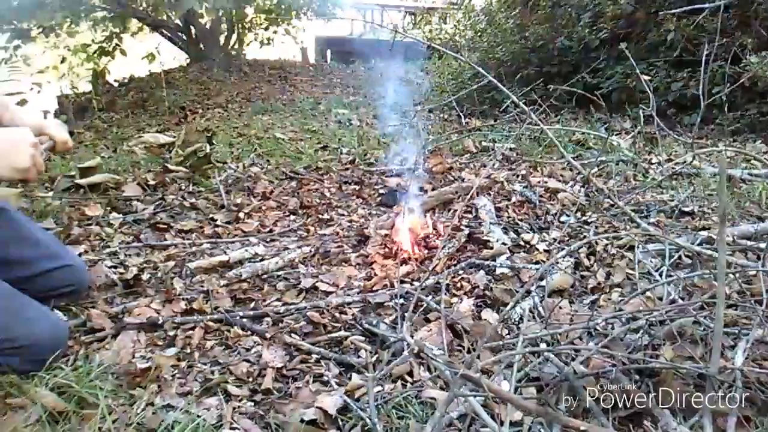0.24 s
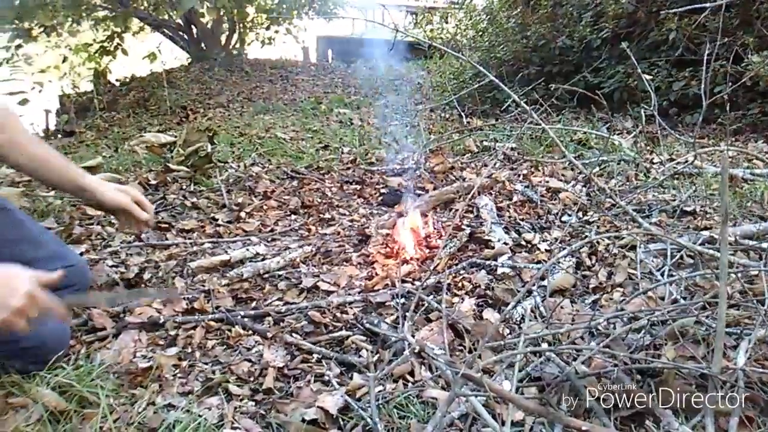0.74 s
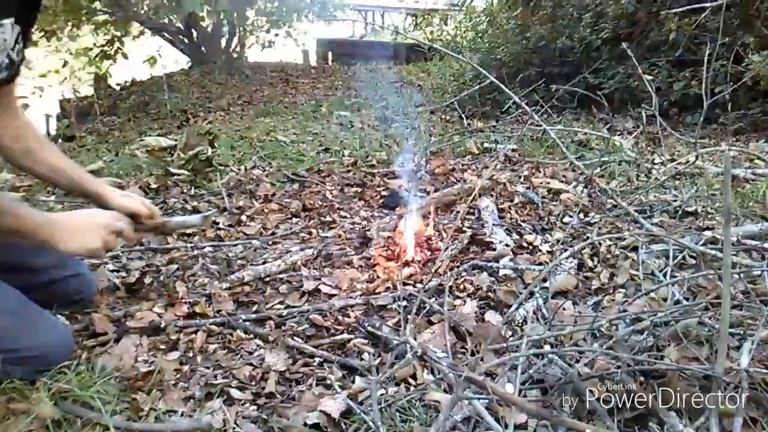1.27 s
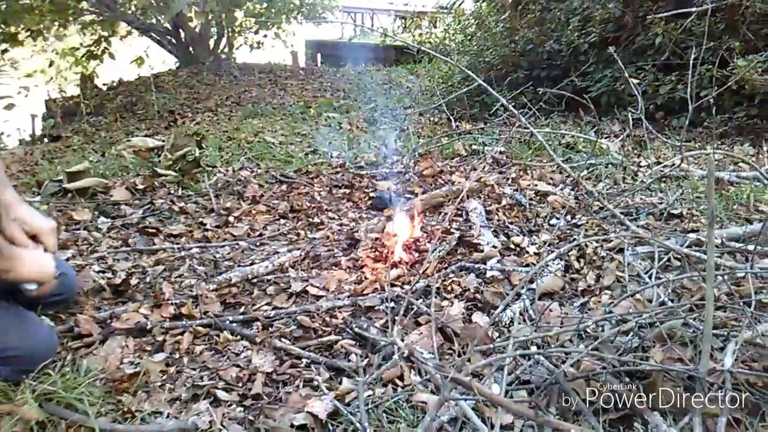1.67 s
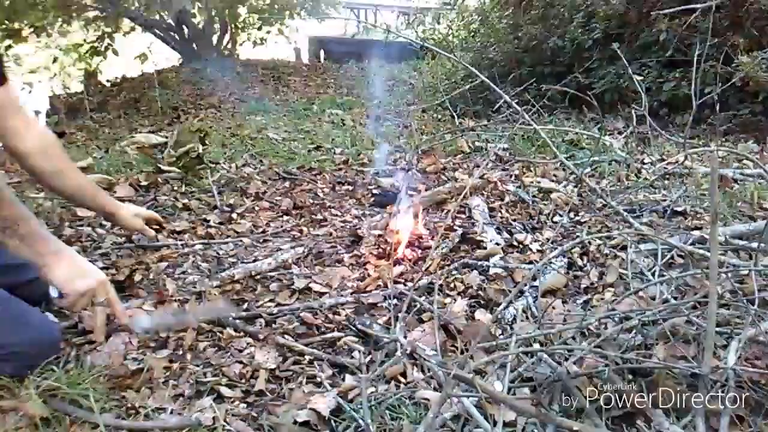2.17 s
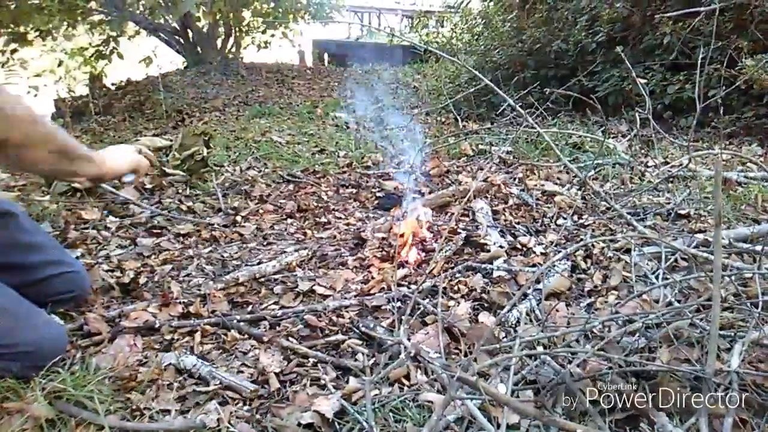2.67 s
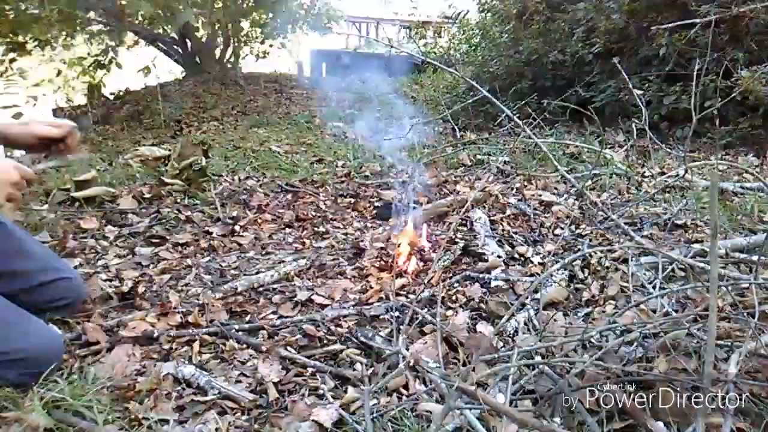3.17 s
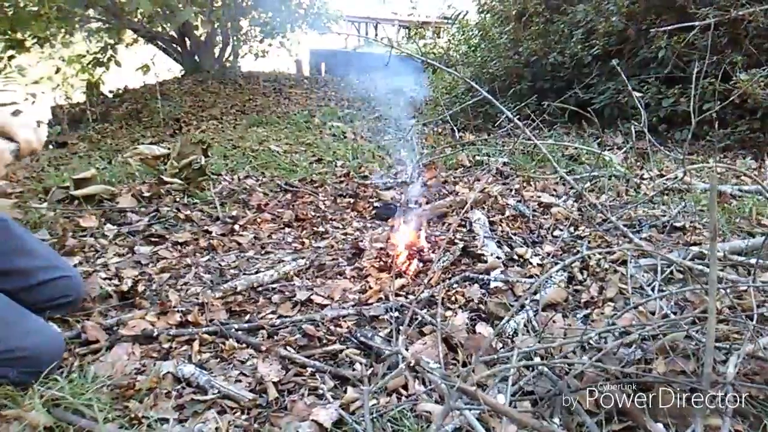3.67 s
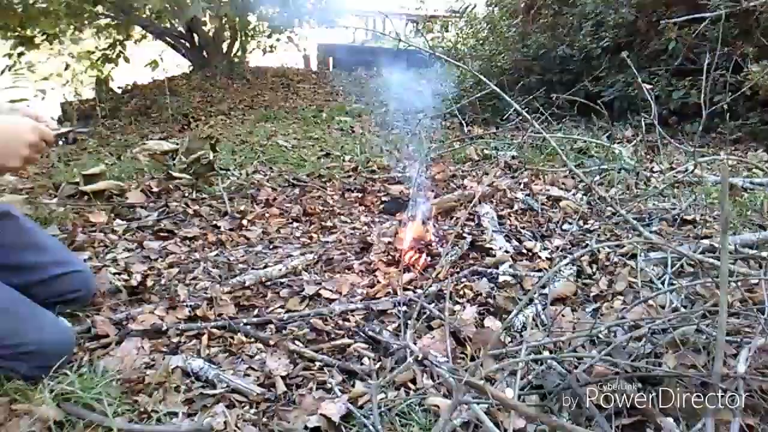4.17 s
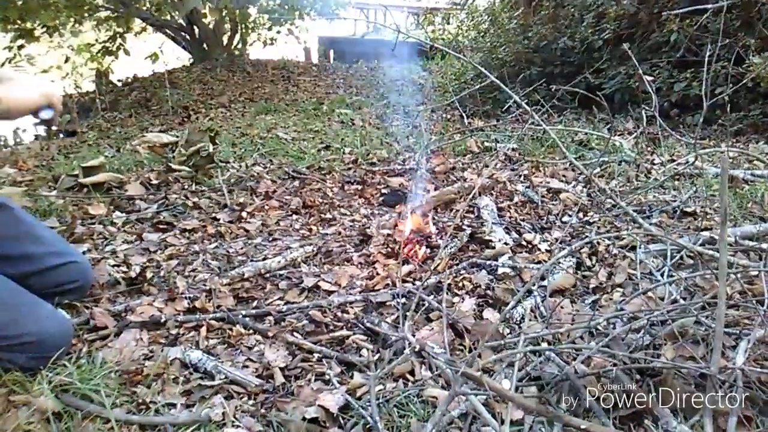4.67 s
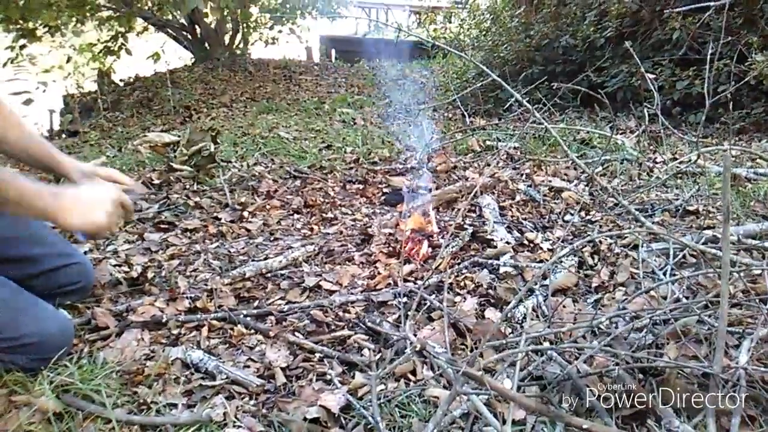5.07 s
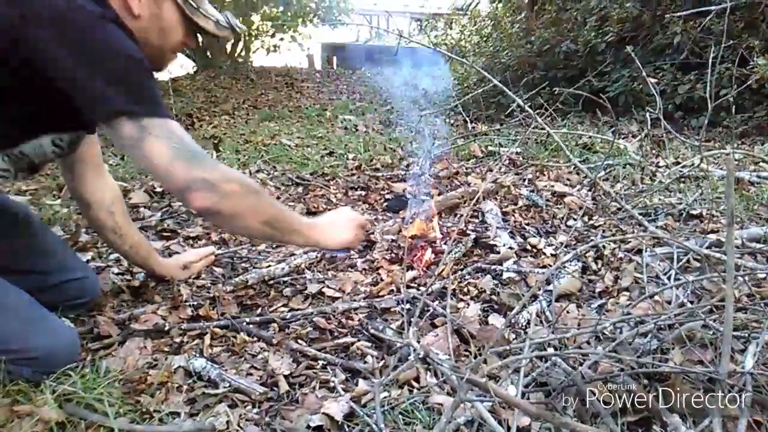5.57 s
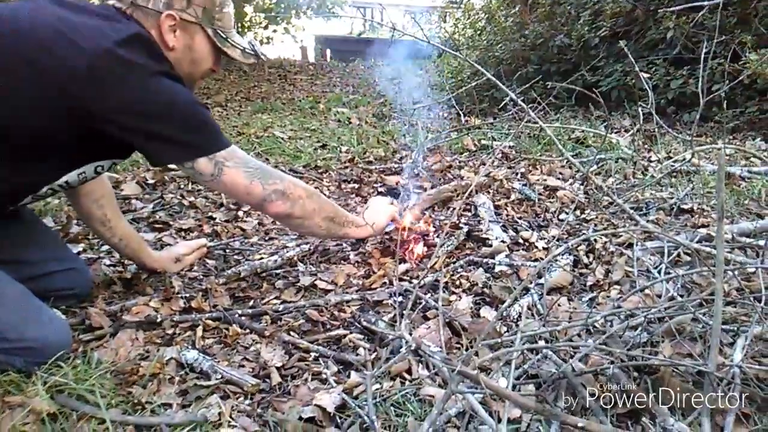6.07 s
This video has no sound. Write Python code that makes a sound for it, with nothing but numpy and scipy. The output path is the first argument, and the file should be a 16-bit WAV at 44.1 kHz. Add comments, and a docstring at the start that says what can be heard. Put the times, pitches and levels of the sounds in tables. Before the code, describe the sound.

In a quiet yard among trees, someone breaks kindling close by. Twigs crack at irregular intervals between short crunches of dry leaves, building to one loud, splintering snap of a thicker stick, then easing into light clicks and rustling. A small fire ticks and hisses softly throughout. Faint crickets call in the distance over a low rumble of air, and a closer one trills now and then to the left.

```python
"""A low outdoor rumble, far crickets and the ticking fizz of a small leaf fire fill a wooded yard.
Someone kneels by the fire, picks twigs from the crackling dry leaves and snaps them for kindling.
Each snap is a burst of tearing fibres with a short tail from the trees; thicker sticks ring briefly.
On the left, one near cricket trills now and then, a raspy whistle to each wing stroke."""
import sys
import numpy as np
from scipy import signal
from scipy.fft import rfft, irfft
from scipy.io import wavfile
from scipy.ndimage import uniform_filter1d

SR = 44100
rng = np.random.default_rng(int(sys.argv[2]) if len(sys.argv) > 2 else 0)


def digitize_waveform(pressure):
    """Quantize a signal to 16-bit integers and store it at the path in sys.argv[1].

    Rows of a 2-D input are taken as channels; values are limited to [-1, 1].
    """
    field = np.atleast_2d(pressure).T
    bounded = np.clip(field, -1, 1)
    quanta = np.round(bounded * 32767).astype(np.int16)
    wavfile.write(sys.argv[1], SR, quanta)


N = 278712
TIME = np.arange(N) / SR
GROUND_LAG_S = 0.00017  # left port behind right, for sound from the leaves


def amp(db):
    """Decibels to gain."""
    return 10 ** (np.asarray(db) / 20)


def unit(x):
    """Scales to rms 1."""
    return x / np.sqrt(np.mean(x ** 2) + 1e-20)


def read(points, hz):
    """Reads a table on a log-frequency axis."""
    f, value = np.transpose(points)
    return np.interp(np.log(hz + 1), np.log(f + 1), value)


def add(mix, start_s, sound):
    """Mixes a sound in at start_s."""
    part = mix[..., max(round(start_s * SR), 0):][..., :sound.shape[-1]]
    part += sound[..., :part.shape[-1]]


def colour(x, points):
    """Applies a spectrum table, rolling off beyond its ends; rms 1."""
    hz = np.fft.rfftfreq(N, 1 / SR)
    rolloff = np.minimum(hz / points[0][0], 1) ** 2 / np.maximum(hz / points[-1][0], 1) ** 2
    return unit(irfft(rfft(x) * amp(read(points, hz)) * rolloff, N))


def minimum_phase(gain_db):
    """Causal impulse response with the given gain per bin."""
    log_gain = np.log(amp(np.r_[gain_db, gain_db[-2:0:-1]]))
    return np.fft.ifft(np.exp(np.conj(signal.hilbert(log_gain)))).real


def stroke(peak_s, rise_s, fall_s, hold_s=0):
    """Envelope of one movement: builds, holds, dies away ever faster."""
    build = np.clip(1 + (TIME - peak_s) / rise_s, 0, 1) ** 2
    return build * np.exp(-np.clip((TIME - peak_s - hold_s) / fall_s, 0, 10) ** 1.09)


def wander(per_s):
    """Random drift, rms 1."""
    return unit(np.interp(TIME * per_s, np.arange(500), rng.standard_normal(500)))


def grains(per_s):
    """Tiny fractures of uneven size, each a stereo noise burst of about 1 ms."""
    sizes = amp(4 * np.minimum(rng.exponential(1, N), 3)) * (rng.random(N) < per_s / SR)
    power = signal.lfilter([1], [1, -np.exp(-2 / (.0009 * SR))], sizes ** 2)
    return unit(np.sqrt(power) * rng.standard_normal((2, N)))


# left-right likeness: f/Hz, coherence
PORT_COHERENCE = [(300, .4), (1200, 0.52), (2200, .7), (3200, 0.84), (4500, 0.31), (7000, 0.36),
                  (11000, 0.19)]

def ports(pair, share, lag_s=GROUND_LAG_S):
    """Two microphone ports: the left hears part of the right's sound, slightly later."""
    size = pair.shape[1]
    hz = np.fft.rfftfreq(size, 1 / SR)
    own, right = rfft(pair)
    coherence = np.clip(share * read(PORT_COHERENCE, hz), 0, 1)
    delayed = right * np.exp(-2j * np.pi * hz * lag_s)
    left = coherence * delayed + np.sqrt(1 - coherence ** 2) * own
    return irfft(np.array([left, right]), size)


# outdoor air spectrum: f/Hz, level/dB
AIR_SPECTRUM = [(25, -24), (40, -5.5), (62, 0.5), (90, -4.5), (125, -6), (160, -9.5), (200, -8), (400, -14),
                (600, -13.5), (980, -16.5), (1100, -23.5), (2600, -22.5), (3400, -23)]
# rumble contour: t/s, level/dB
RUMBLE = [(0, -65.5), (1.2, -63), (1.9, -66), (2.4, -64), (3.3, -63), (3.9, -66.5), (5.0, -66.5),
          (5.6, -64.5), (6.32, -64)]
# the kneeling body shifts its weight: t/s, level/dB
BUMPS = [(.245, -59), (.45, -57.5), (1.28, -54), (1.6, -59.5), (2.3, -73), (2.52, -57), (3.15, -52.5),
         (3.365, -52.5), (5.61, -58), (5.96, -60), (6.23, -61.5)]

def air(upper_db=-69, sway_db=-0.3, split_hz=300):
    """Outdoor rumble that sways a little and carries dull bumps; its upper part stays even."""
    noise = colour(ports(rng.standard_normal((2, N)), share=0.23), AIR_SPECTRUM)
    low = signal.sosfiltfilt(signal.butter(2, split_hz, fs=SR, output="sos"), noise)
    bumps = sum(amp(db) * stroke(s, rise_s=0.064, fall_s=0.036) for s, db in BUMPS)
    rumble = amp(np.interp(TIME, *np.transpose(RUMBLE)) + sway_db * wander(per_s=13))
    pan = amp([[-0.5], [0.5]])
    return amp(upper_db) * (noise - low) + low * np.hypot(rumble, bumps) * pan


# far cricket calls: start/s, end/s, level/dB
FAR_CALLS = [(-.04, 0.66, -64), (0.58, 0.873, -63.5), (0.977, 1.453, -59.5), (1.49, 2.23, -72.5),
             (2.176, 2.736, -63.5), (3.02, 3.61, -64.5), (3.545, 3.944, -66.5), (3.95, 4.373, -66),
             (4.62, 5.177, -64.5), (5.49, 6.45, -68)]
# their band: f/Hz, level/dB
CHORUS_SPECTRUM = [(3300, -32), (3650, -10), (3830, -2), (4060, 0), (4180, -5), (4400, -30)]

def far_crickets(floor_db=-74, fade_s=0.14, flutter_db=0.85, whine_db=-84, whine_hz=13480):
    """Calls swell and fade in turn, blurred into one fluttering band under a thin high whine."""
    power = amp(floor_db) ** 2
    for start_s, end_s, db in FAR_CALLS:
        swell = np.clip(np.minimum(TIME - start_s, end_s - TIME) / fade_s, 0, 1)
        power = power + (amp(db) * swell) ** 2
    band = colour(rng.standard_normal((2, N)), CHORUS_SPECTRUM)
    flutter = amp(flutter_db * wander(per_s=37))
    whine_spectrum = [(whine_hz - 300, -35), (whine_hz, 0), (whine_hz + 300, -35)]
    whine = colour(rng.standard_normal((2, N)), whine_spectrum)
    return band * np.sqrt(power) * flutter + amp(whine_db) * whine


# flame fizz: f/Hz, level/dB
FIZZ_SPECTRUM = [(1000, -13), (3000, -11.5), (5000, -14), (8000, 9.5), (13000, 8), (14300, -19),
                 (15200, -34)]
# dry leaf cracking, burnt or crushed: f/Hz, level/dB
LEAF_SPECTRUM = [(1470, -52), (2500, -19), (3270, -26), (3860, -14), (6740, -7.5), (8350, -6.5),
                 (11000, -11.5), (14300, -13), (14700, -37), (15500, -74)]

def fire(ticks_db=-75, fizz_db=-74):
    """Tiny ticks of burning leaves over a steady fizz."""
    ticks = colour(ports(grains(per_s=400), share=0.5), LEAF_SPECTRUM)
    fizz = colour(rng.standard_normal((2, N)), FIZZ_SPECTRUM)
    return amp(ticks_db) * ticks + amp(fizz_db) * fizz


# hand or knee presses the leaves: peak/s, crisp/dB, scrape/dB, press/s, settle to 1/e/s
STIRS = [(0.24, -59.5, -66.5, 0.3, 0.27), (0.469, -53.5, -75, 0.044, 0.011), (0.714, -58.5, -69, .012, .09),
         (1.077, -36, -46, 0.017, 0.027), (1.16, -55.5, -64, 0.071, 0.09),
         (1.275, -45, -57.5, 0.062, 0.063), (1.48, -62, -77, 0.18, 0.13), (1.63, -62, -72, 0.043, 0.099),
         (1.88, -64, -92, 0.11, 0.091), (2.183, -52.5, -60.5, 0.041, 0.057), (2.436, -37, -49, 0.027, 0.13),
         (2.584, -45.5, -57, 0.11, 0.063), (3.133, -38, -52.5, 0.042, 0.019), (3.3, -59, -68.5, 0.18, 0.06),
         (3.6, -58.5, -74, 0.11, 0.082), (3.77, -61, -84, 0.048, 0.074),
         (3.999, -40.5, -58.5, 0.086, 0.012), (4.419, -46.5, -60.5, .025, .025),
         (4.49, -59.5, -60, 0.058, 0.052), (4.87, -71, -74.5, 0.13, 0.065), (5.06, -56, -79, 0.034, 0.019),
         (5.45, -66, -88, 0.13, .16), (5.603, -43.5, -57, 0.04, 0.058), (5.93, -60, -70.5, .06, 0.029),
         (6.225, -65, -71.5, 0.038, .2)]
# leaf scrape: f/Hz, level/dB
SCRAPE_SPECTRUM = [(150, -36.5), (400, -8.5), (750, -3.5), (1200, -5), (2000, -0.5), (2800, 0.5),
                   (4500, -21.5)]
# stick drawn over leaves: f/Hz, level/dB
DRAG_SPECTRUM = [(900, -33), (1300, -10), (1900, -10), (2300, -25), (3200, 3), (5000, 3), (7000, -8),
                 (14000, -11), (15500, -56)]

def leaves(stir_trim_db=-1, rest_crisp_db=-80, rest_scrape_db=-86, drag_db=-46):
    """Crushed leaves: crisp grains and sparse cracks over a duller scrape; one stick is dragged."""
    cracks = .45 * grains(per_s=150)
    crisp = colour(ports(grains(per_s=2300) + cracks, share=0.9), LEAF_SPECTRUM)
    scrape = colour(ports(grains(per_s=1800) + cracks, share=0.85), SCRAPE_SPECTRUM)
    drag = colour(ports(grains(per_s=3700), share=0.9), DRAG_SPECTRUM)
    crisp_power, scrape_power = amp(rest_crisp_db) ** 2, amp(rest_scrape_db) ** 2
    for peak_s, crisp_db, scrape_db, press_s, settle_s in STIRS:
        press = amp(stir_trim_db) * stroke(peak_s, press_s, settle_s)
        crisp_power = crisp_power + (amp(crisp_db) * press) ** 2
        scrape_power = scrape_power + (amp(scrape_db) * press) ** 2
    pull = amp(drag_db) * stroke(peak_s=2.18, rise_s=0.044, fall_s=0.013, hold_s=.032)
    return crisp * np.sqrt(crisp_power) + scrape * np.sqrt(scrape_power) + drag * pull


# near cricket trills: start/s, end/s, level/dB, f/Hz, wing rate/Hz
TRILLS = [(0.089, 0.545, -65, 3746, 34), (0.928, 1.365, -68, 3686, 35.4), (3.058, 3.5, -65.5, 3742, 34.6),
          (5.78, 6.28, -67.5, 3732, 32)]

def near_cricket(duty=.86):
    """Each wing stroke is a short, raspy whistle whose pitch arches, then sinks as the wing slows."""
    out = np.zeros(N)
    for start_s, end_s, db, hz, wing_hz in TRILLS:
        t = np.arange(0, end_s - start_s, 1 / SR)
        sweep = np.minimum(t * wing_hz % 1 / duty, 1)
        waver, rasp = (unit(uniform_filter1d(v, size=110))[:len(t)] for v in rng.standard_normal((2, N)))
        pitch_hz = hz * (1 - .035 * (sweep - .5) - .19 * (sweep - .5) ** 2 + .008 * waver)
        force = np.sin(np.pi * sweep) * (1 + .25 * rasp)
        song = force * np.sin(2 * np.pi * np.cumsum(pitch_hz) / SR)
        add(out, start_s, amp(db) * unit(song * signal.windows.tukey(len(t), .08)))
    return np.array([out, out])


# yard reverberation: f/Hz, t60/s
TREE_DECAY = [(300, 0.33), (2000, 0.61), (6000, 0.64), (14000, 0.43)]

def trees(x):
    """Diffuse scatter from trunks and bushes; each band dies at its own speed."""
    hz, t, bands = signal.stft(rng.standard_normal((2, SR)), SR, nperseg=256)
    decay = amp(-60 * t / read(TREE_DECAY, hz)[:, None])
    tail = signal.istft(bands * decay, SR, nperseg=256)[1]
    return signal.fftconvolve(x, tail / np.linalg.norm(tail[0]), axes=1)[:, :N]


# breaking twig: f/Hz, level/dB
SNAP_SPECTRUM = [(80, -59), (500, -32), (720, -21), (950, -23.5), (1400, -17), (1950, -15.5), (2400, -13),
                 (2900, -8.5), (3600, -4.5), (4700, -6.5), (6500, -2), (8000, 1), (9700, 3), (12000, -1.5),
                 (14300, -8), (15500, -37.5)]

def snap(level_db, body_db, top_db, fall_s, lag_s=GROUND_LAG_S, rise_s=0.00055, scatter_s=0.0072):
    """Fibres tear in a quick burst that rings the twig's resonances and scatters off the ground."""
    t, hz = np.arange(2048) / SR, np.fft.rfftfreq(1024, 1 / SR)
    burst = (np.exp(-t / fall_s) + 0.25 * np.exp(-t / scatter_s)) * (1 - np.exp(-t / rise_s))
    tear = ports(rng.standard_normal((2, len(t))), share=0.98, lag_s=lag_s) * burst
    resonances_db = 2 * unit(uniform_filter1d(rng.standard_normal(len(hz)), size=9))
    woody_db = read([(900, 0.82), (2000, 1.0), (4500, 0)], hz) * (body_db + 19)
    sizzle_db = read([(6000, 0.016), (11000, 0.98)], hz) * (top_db + 3)
    twig = minimum_phase(read(SNAP_SPECTRUM, hz) + resonances_db + woody_db + sizzle_db)
    sound = signal.fftconvolve(tear, twig[None], axes=1)
    return amp(level_db) * sound * np.sqrt(np.sum(burst ** 2) / np.sum(sound ** 2))


# twig snaps and fire pops: t/s, level/dB, body/dB (neutral -19), top/dB (neutral -3), fall to 1/e/s
SNAPS = [(0.099, -41.5, -22, -12, 0.00091), (0.184, -39, -10, -11, .001), (0.2273, -37, -16, -10.5, 0.0011),
         (0.2918, -35, -6.5, -14, 0.0013), (0.361, -49, -24, -14, 0.0027), (0.471, -42, -35, -2, .002),
         (1.054, -33, -24, -15, 0.00081), (1.073, -29, -40, -22, 0.004), (1.082, -25, -51, -11, 0.0037),
         (1.201, -45.5, -32, -17, .0015), (1.254, -42, -33, -15, 0.0032), (1.4266, -48, -40, -14, 0.0033),
         (1.613, -45.5, -12.5, -11, 0.0025), (1.7812, -38.5, -29, -12, 0.0017),
         (1.939, -50.5, -6, -7, .0024), (1.9631, -42, -13, -21, 0.0018), (2.427, -34, 3, -6, 0.0033),
         (2.4322, -19.5, -48, -19, 0.0013), (2.4367, -30, 1, 6, 0.011), (2.4425, -19.5, -43, -23, 0.0019),
         (2.4437, -23, -3, 11, 0.0019), (2.54, -31, -52, -21, .0017), (2.575, -28.5, -69, -12, 0.0021),
         (2.67, -37, -53, -15, 0.0021), (2.994, -38.5, -48, -2, .0012), (3.057, -45.5, -30, -10, 0.0036),
         (3.074, -42, -22, -6, 0.0033), (3.1108, -37.5, -45, -3, 0.0018), (3.1242, -20.5, -35, -5, 0.0018),
         (3.1348, -30, -8.5, -11, 0.0026), (3.1399, -31, -14, -7, .002), (3.549, -44.5, -39, -8, 0.0032),
         (3.5819, -26.5, -26.5, -12.5, 0.0018), (3.8526, -46.5, -32, -1, 0.0057),
         (3.8659, -34.5, -17, -18, 0.0011), (3.8924, -46, -17, -11, 0.0021),
         (3.9443, -38.5, -47.5, -4, .0013), (3.9738, -23, -17, 1.5, 0.0014),
         (3.9848, -10.5, -18, -4, 0.0022), (3.9883, -14.5, -5, 25, 0.0021),
         (3.993, -12.5, -27.5, -21, 0.0022), (4.0912, -32, -16, 2, 0.0016),
         (4.2606, -43.5, -4, -19, 0.0016), (4.3958, -48.5, -25, 2, 0.0021),
         (4.4152, -36.5, -13, -3.5, 0.0023), (4.4432, -28.5, -11, -13, 0.0015),
         (4.4857, -36, -2, -5, .0023), (4.5981, -45, -4, 2, 0.0015), (4.659, -45.5, -14, -4, .0012),
         (4.6704, -43, -19, -1, .0014), (4.86, -53.5, 4, -7, 0.0019), (5.269, -36, -49, -13, 0.00095),
         (5.2797, -51, -4, -11.5, .0024), (5.67, -38.5, -50, -12, 0.0012), (5.922, -44, -16, 2, 0.0026)]
# bearing of the twigs: t/s, left port lag/s
TWIG_BEARING = [(2.7, 0.00013), (3.1, 0.00019), (3.95, .00025), (4.45, .0002)]

def snaps(gain_db=3):
    """Twigs snap and the fire pops; a thick twig gives way in several cracks."""
    out = np.zeros((2, N))
    for start_s, level_db, body_db, top_db, fall_s in SNAPS:
        lag_s = np.interp(start_s, *np.transpose(TWIG_BEARING))
        add(out, start_s, snap(level_db, body_db, top_db, fall_s, lag_s))
    return amp(gain_db) * out


# hiss returned by foliage: f/Hz, level/dB
ECHO_SPECTRUM = [(400, -34.5), (1000, -24), (2000, -13.5), (2500, -5), (4000, -0.5), (6500, 1),
                 (10000, 0.5), (14000, -8.5), (15200, -49.5)]

def foliage_echo(x, t60_s=0.28, build_s=0.0014):
    """Countless leaves return a crack as a hiss that follows its power, flecked by flying splinters."""
    power = uniform_filter1d((x ** 2).mean(0), size=64)
    t = np.arange(SR // 2) / SR
    tail = np.exp(-2 * np.log(1000) * t / t60_s) * (1 - np.exp(-t / build_s))
    echo_power = abs(signal.fftconvolve(power, tail / tail.sum())[:N])
    splinters = .55 * grains(per_s=110)
    hiss = colour(ports(rng.standard_normal((2, N)) + splinters, share=0.45), ECHO_SPECTRUM)
    return np.sqrt(echo_power) * hiss


# sticks ringing as they break or knock: t/s, f/Hz, level/dB, t60/s
KNOCKS = [(0.293, 2840, -43, .018), (1.939, 1330, -48, 0.019), (3.127, 3540, -25, 0.034),
          (3.127, 800, -50, .03), (3.864, 2970, -31, 0.014), (3.9869, 2396, -28, 0.051),
          (3.994, 2630, -30.5, .03), (4.4436, 650, -36, .015), (5.2702, 6470, -33, 0.02)]

def knocks(rise_s=0.00063, left_lag_samples=4):
    """A thicker stick swings up and rings briefly in a bending mode."""
    out, t = np.zeros(N), np.arange(4096) / SR
    for start_s, hz, db, t60_s in KNOCKS:
        swing = (1 - np.exp(-t / rise_s)) * np.exp(-np.log(1000) * t / t60_s)
        add(out, start_s, amp(db) * swing * np.sin(2 * np.pi * hz * t))
    return np.array([np.roll(out, left_lag_samples), out])


def embers(per_s=3.4, max_pops=120):
    """Faint pops at random moments, each of its own size and woodiness."""
    out = np.zeros((2, N))
    starts_s = np.cumsum(rng.standard_exponential(max_pops)) / per_s
    for start_s, (size, woodiness) in zip(starts_s, rng.uniform(-1, 1, (max_pops, 2))):
        pop = snap(level_db=-65 + 3 * size, body_db=-16 + 8 * woodiness, top_db=-4, fall_s=0.00092)
        add(out, start_s, pop)
    return out


# background dips: t/s, gain/dB
LULLS = [(.67, -2), (.88, -4), (2.91, -5), (4.35, -1.5), (5.2, -5.5), (6.13, -2.5)]

def lulls(half_width_s=0.064):
    """Gain of the leaves and background, dipping briefly now and then."""
    return amp(sum(db * np.exp(-((TIME - s) / half_width_s) ** 2) for s, db in LULLS))


def scene(snap_echo_db=-11, cricket_pan_db=9):
    """The work at the fire is close by, the near cricket on the left; the rest lies all around."""
    cracks, trill, wood = snaps(), near_cricket(), knocks()
    left_trill = trill * amp([[cricket_pan_db], [-cricket_pan_db]])
    yard = trees(amp(-18) * wood + amp(-6) * trill)
    echo = amp(snap_echo_db) * foliage_echo(cracks)
    background = far_crickets() + air() + fire() + embers()
    return cracks + wood + left_trill + yard + echo + (leaves() + background) * lulls()


# port balance: f/Hz, left minus right/dB
PORT_BALANCE = [(300, -.5), (1200, -2.5), (2000, -3), (2900, 0.5), (5500, 0), (9000, -1.5), (11500, -5)]

def record(dry, cutoff_hz=15900):
    """The left port is duller than the right; a steep low-pass limits both."""
    balance_db = read(PORT_BALANCE, np.fft.rfftfreq(N, 1 / SR))
    heard = irfft(rfft(dry) * amp([balance_db / 2, -balance_db / 2]), N)
    lowpass = signal.firwin(511, cutoff_hz, window=("kaiser", 9), fs=SR)
    return signal.oaconvolve(heard, lowpass[None], "same")


dry = scene()
out = record(dry)
digitize_waveform(out)
```